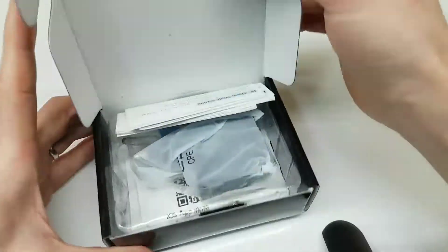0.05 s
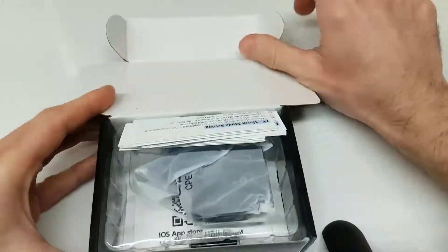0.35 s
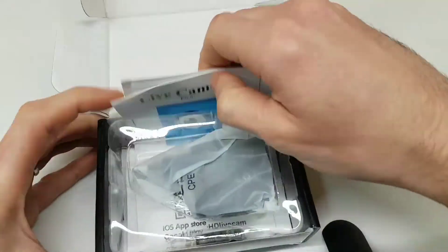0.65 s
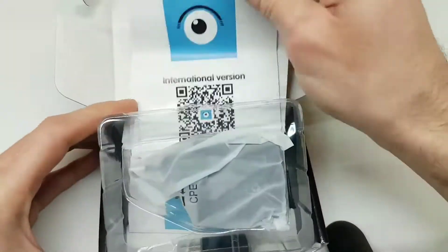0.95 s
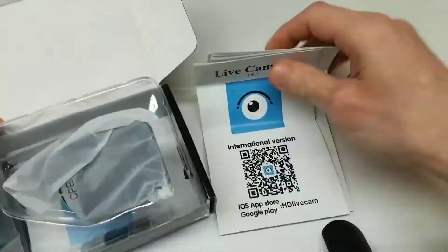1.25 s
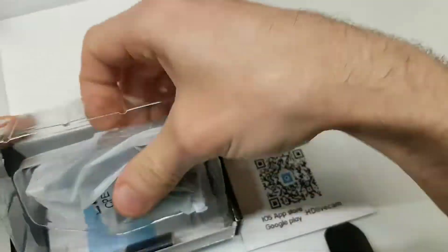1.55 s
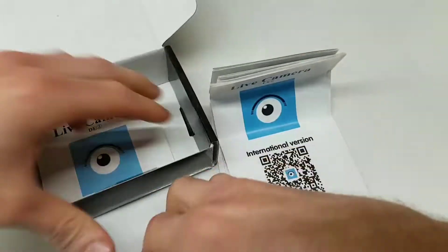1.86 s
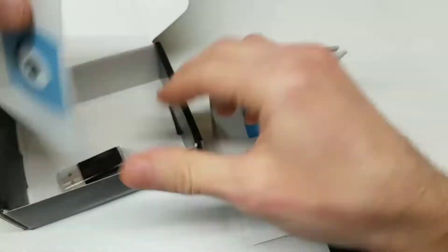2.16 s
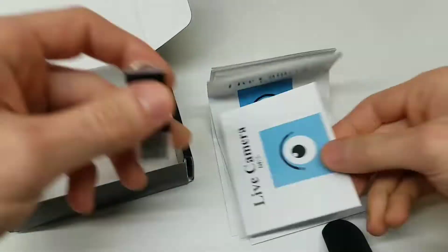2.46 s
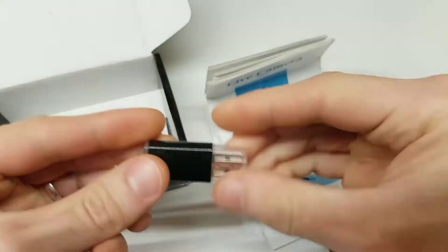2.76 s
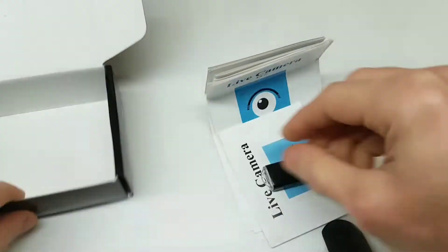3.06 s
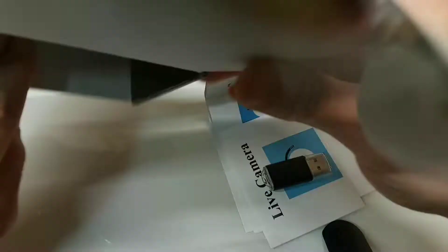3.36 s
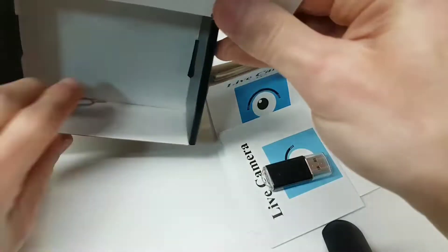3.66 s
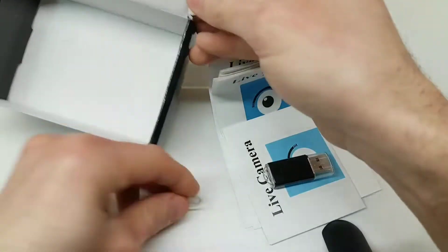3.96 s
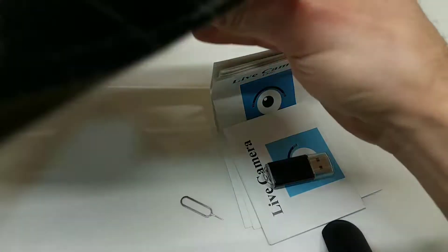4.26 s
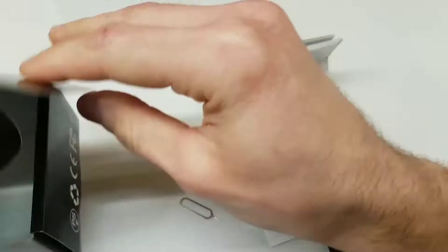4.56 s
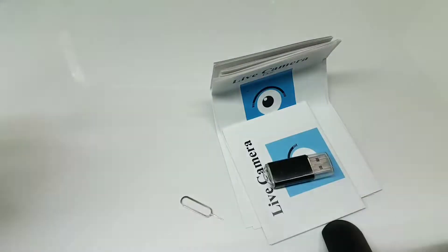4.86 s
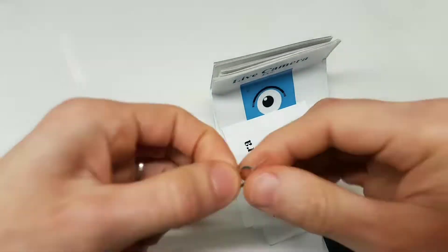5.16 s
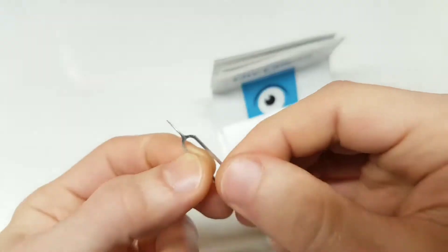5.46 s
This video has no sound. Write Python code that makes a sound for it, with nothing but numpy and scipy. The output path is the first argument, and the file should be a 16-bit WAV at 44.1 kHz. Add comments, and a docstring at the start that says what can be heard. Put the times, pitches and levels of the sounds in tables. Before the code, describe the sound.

Fingers fold back the lid of a small cardboard box with soft rubs and taps. A paper leaflet slides out, then a thin plastic tray scrapes and crackles as it is lifted. A memory stick drops into the box with a clack and a tiny metallic clink. The empty box is turned over and put aside with hollow scrapes and light knocks, all close to the microphone in a quiet room.

```python
"""A small cardboard box is unpacked on a table in a quiet room, close to the microphone.
Fingers fold back the lid and a leaflet slides out; stick-slip on the card drives panels and inner air.
A thin plastic tray slides and snaps as it is lifted out. A memory stick drops onto the bottom of the
box, its metal plug clinking. The empty box, ringing higher, is turned over and put aside."""
import sys
import numpy as np
from scipy import signal
from scipy.fft import rfft, irfft
from scipy.io import wavfile

SR = 44100
rng = np.random.default_rng(int(sys.argv[2]) if len(sys.argv) > 2 else 0)


def materialize(psi):
    """Save the field psi as 16-bit PCM at rate SR to the path in sys.argv[1].

    A 1-D psi becomes a single channel; in a 2-D psi each row is a channel.
    """
    bounded = np.clip(np.atleast_2d(psi).T, -1, 1)
    quanta = np.round(bounded * 32767).astype(np.int16)
    wavfile.write(sys.argv[1], SR, quanta)


N = 247842
TIME_S, BINS_HZ = np.arange(N) / SR, np.fft.rfftfreq(N, 1 / SR)
# what slides on the card: name -> (cavity/dB and hiss/dB against the panel, hiss tilt (+ is brighter),
# panel resonance f/Hz, width/Hz, its power share (clipped to 0-1))
CONTACTS = {"brush": (-0.5, 0.5, 0.2, 1239, 205, 0.4), "finger": (-4, -6.5, .05, 1179, 174, .5),
            "paper": (-6, -14, .05, 884, 130, 0.8), "leaflet": (-2, -8, -0.6, 1874, 374, -0.26),
            "plastic": (-8.5, -8.5, -0.94, 939, 141, .55), "edge": (-12, -11, -0.1, 1572, 301, .75)}


def snaps(cavity_db=-6, crack_db=1, crack_s=0.0002, strain_db=-17, strain_s=0.0028):
    """Tray, card and stick creak under strain, then let go. Returns cavity and panel drive, ring, tick."""
    events = [ (0.1041, -50, 1130, .03, -48.5), (0.3896, -43, 1205, 0.038, -73),
              (0.7974, -31.5, 2110, .034, -45), (0.8284, -29.5, 557, 0.018, -28),
              (0.8955, -28.5, 588, .06, -38), (0.897, -28.5, 1850, 0.029, -47),
              (0.91, -41, 550, 0.015, -39), (1.2177, -47.5, 1080, 0.024, -70),
              (1.4378, -27, 1120, 0.033, -30.5), (1.439, -32.5, 3120, 0.033, -35),
              (1.478, -40, 1120, .06, -45), (1.484, -37.5, 1020, .034, -48), (1.5359, -52, 980, .07, -39.5),
              (1.589, -27.5, 958, .06, -30), (1.599, -26.5, 990, .022, -21),
              (1.606, -33, 3090, 0.019, -28.5), (1.6509, -38, 1390, .026, -37),
              (1.7964, -43, 862, .06, -66), (1.865, -25.5, 1614, .022, -30.5), (2.112, -52, 950, .02, -46),
              (2.1873, -27, 830, .024, -19.5), (2.2131, -19.5, 960, .022, -26),
              (2.2712, -64, 1680, 0.03, -45.5), (3.0982, -47, 990, 0.025, -57),
              (3.2715, -46.5, 500, .05, -50.5), (3.332, -49.5, 1070, .05, -54),
              (3.614, -39, 1670, 0.015, -49), (4.0954, -52, 496, 0.0086, -55),
              (4.1132, -62, 510, 0.012, -46.5), (4.42, -56.5, 1115, 0.064, -68),
              (4.493, -62, 1110, 0.016, -55)]  # t/s, body level/dB, ring f/Hz, body t60/s, tick level/dB
    ring_share = [(-44, 0.74), (-35.5, 0.4)]  # hard contacts wake more modes: body level/dB, ring power share
    tick_spectrum = [(1500, -28.5), (3500, -3), (5500, -5.5), (7300, -7.5), (9500, -2.5), (11200, 1),
                     (13500, 1), (15300, 0.5), (16500, -2.5)]  # f/Hz, level/dB
    body, ring, tick = np.zeros((3, 2, N))
    lead_s = 0.02
    t = TIME_S[:SR // 10] - lead_s
    released, since_s = t >= 0, np.maximum(t, 0)
    strain = ~released * amp(strain_db) * np.exp(-abs(t) / strain_s)
    crack = strain + released * amp(crack_db) * np.exp(-since_s / crack_s) / 2
    for at_s, body_db, hz, t60_s, tick_db in events:
        start_s = at_s - lead_s
        share = np.interp(body_db, *np.transpose(ring_share))
        envelope = amp(body_db) * (strain + released * decay(since_s, t60_s))
        add(body, start_s, np.sqrt(1 - share) * envelope * stereo_noise(0.43, len(t)))
        add(ring, start_s, np.sqrt(2 * share) * envelope * np.cos(2 * np.pi * hz * t))
        burst = crack * stereo_noise(0.4, len(t))
        modes = 0.65 * released * high_modes(since_s, 0.81 * t60_s)
        add(tick, start_s, amp(tick_db) * (burst + modes))
    return np.array([amp(cavity_db) * body, body, ring, colour(tick, tick_spectrum)])


def high_modes(t, t60_s, low_hz=1700, high_hz=14800, count=72):
    """Thin plastic and card have many high modes; each snap rings a different set."""
    hz = rng.uniform(low_hz, high_hz, (count, 1))
    phase = 2 * np.pi * rng.random((count, 1)) + 1.9 * rng.standard_normal((2, count, 1))
    mode_t60_s = t60_s * 2 ** rng.uniform(-0.487, 0.51, (count, 1))
    return np.sqrt(2 / count) * (decay(t, mode_t60_s) * np.sin(2 * np.pi * hz * t + phase)).sum(1)


def plug_clink(at_s=2.1877, hit_db=-23.5):
    """The thin metal shell of the plug rings briefly as the stick lands."""
    shell_modes = [(5710, -18.5, 0.07), (9780, -6.5, 0.032), (10860, -2, 0.035), (11241, 1.5, 0.027),
                   (12049, -19.5, .03)]  # f/Hz, level/dB re hit, t60/s
    out, t = np.zeros((2, N)), TIME_S[:SR // 6]
    for hz, db, t60_s in shell_modes:
        add(out, at_s, amp(hit_db + db) * decay(t, t60_s) * np.sin(2 * np.pi * hz * t))
    return lag_right(out, lag_s=0.000012)


def slides(ease_s=0.012):
    """Leaflet, then tray, is pulled over the card, each pull broken where it catches."""
    # each one pull in two stretches, before and after its snaps: t/s, panel level/dB, hiss level/dB
    leaflet = [
        [(0.68, -80, -86), (0.732, -53.5, -68), (0.748, -59, -69), (0.756, -57.5, -65), (0.782, -54, -64),
         (0.792, -65, -70)],
        [(0.918, -51, -47), (0.928, -43.5, -47), (0.954, -57.5, -66), (1.016, -62.5, -74.5),
         (1.098, -53.5, -58.5), (1.128, -54, -58), (1.164, -87, -78), (1.18, -83, -89)],
    ]
    tray = [
        [(1.657, -50, -56), (1.679, -50, -51.5), (1.695, -60.5, -59), (1.715, -47, -70), (1.733, -66, -63),
         (1.757, -53.5, -69), (1.783, -57.5, -62), (1.801, -43.5, -65), (1.821, -55, -66), (1.845, -47.5, -66),
         (1.858, -63, -72)],
        [(1.878, -48.5, -50.5), (1.886, -46.5, -59), (1.898, -46.5, -56), (1.918, -60, -74),
         (1.976, -55.5, -68), (1.992, -71, -85), (2.014, -52.5, -55), (2.102, -65, -70), (2.116, -52, -57.5),
         (2.146, -63, -76), (2.16, -91, -87)],
    ]
    out = np.zeros((4, 2, N))
    pulls = [(leaflet, "leaflet", 1.5, 1.2), (tray, "plastic", 2.5, -1.2)]
    for stretches, contact, panel_gain_db, hiss_gain_db in pulls:
        for stretch in stretches:
            times_s, panel_db, hiss_db = np.transpose(stretch)
            t = np.arange(times_s[0] - ease_s, times_s[-1] + ease_s, 1 / SR)
            ease = np.clip(np.minimum(t - t[0], t[-1] - t) / ease_s, 0, 1)
            push = amp(np.interp(t, times_s, panel_db) + panel_gain_db)
            hiss_envelope = amp(np.interp(t, times_s, hiss_db) + hiss_gain_db)
            add(out, t[0], ease * friction(push, hiss_envelope, contact))
    return out


def rubs(panel_gain_db=0.6, hiss_gain_db=1.25, rise_share=0.36):
    """Short strokes speed up, then slow; what touches the card sets how much it hisses."""
    strokes = [ (0.127, 0.087, -61, "finger"), (0.239, 0.02, -56, "finger"), (0.262, .028, -50.5, "edge"),
               (0.308, 0.023, -53.5, "finger"), (0.357, 0.071, -58.5, "brush"),
               (0.455, 0.03, -59.5, "brush"), (0.527, 0.061, -58.5, "finger"),
               (0.615, 0.043, -59, "finger"), (0.819, 0.024, -48, "leaflet"),
               (0.866, 0.063, -58.5, "leaflet"), (0.907, 0.036, -44, "leaflet"), (1.223, .02, -50, "paper"),
               (1.301, 0.023, -61.5, "paper"), (1.48, 0.1, -64, "paper"), (1.544, 0.03, -42, "plastic"),
               (1.625, 0.08, -57.5, "plastic"), (2.197, 0.021, -37.5, "plastic"),
               (2.224, 0.011, -45, "plastic"), (2.335, 0.034, -50.5, "plastic"),
               (2.371, 0.061, -68.5, "brush"), (2.923, .04, -57.5, "finger"), (3.091, 0.092, -59, "finger"),
               (3.163, 0.031, -56.5, "finger"), (3.291, 0.038, -66, "brush"),
               (3.335, 0.029, -55.5, "finger"), (3.37, 0.034, -52.5, "brush"),
               (3.462, 0.095, -62.5, "finger"), (3.521, 0.047, -58, "edge"), (3.573, .022, -53.5, "finger"),
               (3.626, 0.045, -48.5, "edge"), (3.742, 0.035, -46, "edge"), (3.787, 0.032, -39.5, "edge"),
               (3.837, 0.033, -49.5, "edge"), (4.048, 0.032, -66.5, "brush"), (4.106, 0.036, -63, "brush"),
               (4.214, 0.025, -59, "finger"), (4.276, 0.041, -55.5, "brush"), (4.379, .028, -59.5, "brush"),
               (4.426, 0.033, -66, "brush"), (4.515, 0.066, -65, "brush"), (4.602, 0.057, -63.5, "brush"),
               (4.721, 0.041, -66, "brush"), (5.044, 0.046, -76.5, "brush")]  # t/s at top speed, length/s, panel level/dB, contact
    out = np.zeros((4, 2, N))
    for peak_s, length_s, db, contact in strokes:
        start_s = max(peak_s - 0.25, 0)
        t = start_s + TIME_S[:SR // 2] - peak_s
        flank_s = length_s * np.where(t < 0, rise_share, 1 - rise_share)
        swell = amp(db) * np.exp(-abs(t / flank_s) ** 1.65)
        hiss_db = CONTACTS[contact][1] + hiss_gain_db
        add(out, start_s, friction(amp(panel_gain_db) * swell, amp(hiss_db) * swell, contact))
    return out


def friction(push, hiss_envelope, contact):
    """A contact slides on card. Returns cavity and panel drive, panel resonance, fine hiss."""
    cavity_db, _, tilt, hz, width_hz, share = CONTACTS[contact]
    size, share = len(push), np.clip(share, 0, 1)
    grip = stick_slip(size)
    fizz = unit_rms(signal.lfilter([1, -tilt], [1], stereo_noise(0.92, size)))
    cavity = amp(cavity_db) * push * grip * stereo_noise(0.6, size)
    panel = np.sqrt(1 - share) * hand_reflection(push * grip * stereo_noise(0.15, size))
    ring = np.sqrt(share) * push * resonate(stereo_noise(0.38, size), hz, width_hz)
    hiss = hand_reflection(hiss_envelope * grip * fizz, gain=0.45)
    return np.array([cavity, panel, ring, hiss])


def stick_slip(size, slips_per_s=600, spread_db=5.0, slip_s=0.001, smooth_share=0.46):
    """Fibres catch and let go in tiny uneven bursts over a smooth slide."""
    slipping = rng.random(size) < slips_per_s / SR
    strength = np.minimum(rng.exponential(1, size), 3)
    bursts = slipping * amp(spread_db * strength) ** 2
    power = signal.lfilter([1], [1, -np.exp(-1 / (slip_s * SR))], bursts)
    return np.sqrt(smooth_share + (1 - smooth_share) * power / (power.mean() + 1e-12))


def hand_reflection(x, gain=0.93, far_delay_s=0.002, sway=0.1, sway_hz=2.5):
    """The moving hand reflects a stroke from a changing distance, rippling its spectrum."""
    t = TIME_S[:x.shape[-1]]
    reach, phase = rng.uniform(0.2, 1), rng.random()
    delay_s = reach * far_delay_s * (1 + sway * np.sin(2 * np.pi * (sway_hz * t + phase)))
    echo = x[:, np.clip(np.round((t - delay_s) * SR).astype(int), 0, len(t) - 1)]
    return (x + gain * echo) / np.hypot(1, gain)


def box(cavity, panel, empty_from_s=2.6):
    """Inner air and panels ring higher and more freely once the box is empty."""
    # broad spectra: f/Hz, level/dB
    cavity_packed = [(60, -16), (190, -13), (280, -6.5), (410, 6), (590, 2.5), (720, -3), (1200, -27.5)]
    cavity_empty = [(60, -22), (200, -13.5), (380, -0.5), (470, 6.5), (560, -20), (1000, -18.5)]
    panel_packed = [(350, -32.5), (600, -8), (800, 1.5), (1150, -3.5), (1400, -2), (1900, -1.5),
                    (2900, -7.5), (4500, -23), (7000, -27.5)]
    panel_empty = [(500, -21.5), (900, 7.5), (1150, -2.5), (1650, 1), (2900, 1.5), (3400, -11.5),
                   (6000, -23), (7500, -40)]
    # panel modes: f/Hz, width/Hz, level/dB above the broad spectrum
    modes_packed = [(610, 40, -2.5), (810, 63, 3.5), (976, 100, 8), (1163, 51, 8), (1640, 48, 5),
                    (2680, 46, 5.5), (3160, 56, 1), (3760, 40, 8.5), (4320, 62, 1.5), (5000, 180, 9.5),
                    (5270, 90, 7)]
    modes_empty = [(1285, 32, 14), (1360, 105, 5.4), (1540, 26, 3), (2216, 92, 10.4), (3020, 120, 4.2),
                   (4100, 63, 7.1), (4380, 360, 12.6), (5300, 39, 14), (5000, 89, 8.1), (6340, 60, 17)]
    is_empty = TIME_S > empty_from_s
    air = colour(cavity * ~is_empty, cavity_packed) + colour(cavity * is_empty, cavity_empty)
    packed_card = colour(panel * ~is_empty, panel_packed, modes_packed)
    empty_card = colour(panel * is_empty, panel_empty, modes_empty)
    return air + packed_card + empty_card


def knocks(overtone_ratio=1.7, overtone_db=-15, thud_db=-13):
    """Soft blows on box and table ring one low mode and a weak overtone, with a short thud."""
    blows = [ (0.241, -46, 88, 0.05, -6), (.316, -41, 378, 0.022, 3), (0.389, -38, 334, 0.038, 1),
             (0.518, -50.5, 100, 0.079, -13), (0.725, -46.5, 410, 0.27, -5), (1.894, -49.5, 97, 0.1, -7),
             (2.181, -38, 324, .038, -2.5), (2.188, -40, 240, 0.032, 3), (2.329, -39.5, 392, 0.037, -6),
             (2.624, -38, 417, 0.073, -10.5), (3.03, -53, 487, 0.042, -17), (3.067, -50, 600, 0.037, -19),
             (3.272, -31.5, 313, 0.027, 7.5), (3.489, -47.5, 463, .048, 1),
             (4.098, -47.5, 484, 0.056, -14.5), (4.319, -46, 460, 0.035, 1), (4.518, -38, 323, 0.017, 9.5),
             (4.727, -46.5, 266, 0.013, -15), (5.132, -55, 456, 0.034, -12.5)]  # t/s, level/dB, f/Hz, t60/s, left-right/dB
    out, t = np.zeros((2, N)), TIME_S[:SR // 4]
    for at_s, db, hz, t60_s, pan_db in blows:
        phase = 2 * np.pi * hz * t
        rise_s = 0.042 * t60_s  # softer blows both rise and ring longer
        envelope = (1 - np.exp(-t / rise_s)) * decay(t, t60_s)
        thud = amp(thud_db) * resonate(stereo_noise(0.41, len(t)), 0.57 * hz, width_hz=92)
        tone = np.sin(phase) + amp(overtone_db) * np.sin(overtone_ratio * phase)
        add(out, at_s, amp(db) * balance(pan_db) * envelope * (tone + thud))
    return lag_right(out)


def room_tail(x, wet_db=-19, build_s=0.0076):
    """Faint tail of a small furnished room, each band dying at its own rate."""
    decay_times = [(150, .4), (1000, 0.11), (4000, 0.16), (14000, 0.11)]  # f/Hz, t60/s
    hz, t, bands = signal.stft(rng.standard_normal((2, SR // 2)), SR, nperseg=256)
    envelope = decay(t, at_hz(decay_times, hz)[:, None]) * (1 - np.exp(-t / build_s))
    tail = signal.istft(bands * envelope, SR, nperseg=256)[1]
    return amp(wet_db) * signal.fftconvolve(x, tail / np.linalg.norm(tail[0]), axes=1)[:, :N]


def room_air(level_db=-66.5):
    """Steady low hum and hiss of the room."""
    spectrum = [(15, -32), (30, -14.5), (54, 1.5), (80, -9), (115, -8), (160, -16), (310, -6.5), (550, -15),
                (1000, -18.5), (1400, -17.5), (2200, -20.5), (5000, -31.5), (9500, -34.5), (14000, -27.5),
                (14350, -24.5), (14700, -28), (16000, -35)]  # f/Hz, level/dB
    coherence = [(60, 0.28), (240, 0.39), (950, 0.12), (3770, 0.041), (15000, 1)]  # f/Hz, left-right correlation
    left, other = rfft(rng.standard_normal((2, N)))
    correlation = at_hz(coherence, BINS_HZ)
    right = correlation * left + np.sqrt(1 - correlation ** 2) * other
    return amp(level_db) * unit_rms(irfft(np.array([left, right]) * amp(at_hz(spectrum, BINS_HZ)), N))


def colour(x, spectrum, modes=()):
    """Minimum-phase filter: broad spectrum plus narrow modes; white noise keeps its power."""
    peaks = sum((amp(db) - 1) / (1 + (2 * (BINS_HZ - hz) / width_hz) ** 2) for hz, width_hz, db in modes)
    gain = unit_rms(amp(at_hz(spectrum, BINS_HZ)) * abs(1 + peaks))
    cepstrum = irfft(np.log(gain + 1e-9), N)
    cepstrum[1:N // 2] *= 2
    cepstrum[N // 2 + 1:] = 0
    return irfft(rfft(x) * np.exp(rfft(cepstrum)), N)


def resonate(x, hz, width_hz):
    """One damped band-pass resonance, at rms 1."""
    pole = np.exp((2j * np.pi * hz - np.pi * width_hz) / SR)
    return unit_rms(signal.lfilter([1, 0, -1], np.poly([pole, pole.conjugate()]).real, x))


def stereo_noise(shared_power, size):
    """Left and right noise sharing part of their power."""
    shared, *own = rng.standard_normal((3, size))
    return np.sqrt(shared_power) * shared + np.sqrt(1 - shared_power) * np.array(own)


def lag_right(x, lag_s=0.00022):
    """Sound reaches the right microphone port after the left."""
    return irfft(rfft(x) * np.exp(-2j * np.pi * BINS_HZ * lag_s * np.array([[0], [1]])), N)


def balance(left_right_db):
    """Level difference to left and right gains."""
    return amp(left_right_db * np.array([[0.5], [-0.5]]))


def amp(db):
    """Decibels to gain."""
    return 10 ** (np.asarray(db) / 20)


def unit_rms(x):
    """Scales to rms 1."""
    return x / np.sqrt(np.mean(x ** 2) + 1e-20)


def at_hz(points, hz):
    """Interpolates a table over log frequency."""
    points_hz, values = np.transpose(points)
    return np.interp(np.log(hz + 1), np.log(points_hz + 1), values)


def decay(t, t60_s):
    """Falls 60 dB in t60_s."""
    return np.exp(-np.log(1000) * t / t60_s)


def add(mix, at_s, sound):
    """Mixes a sound in at at_s."""
    part = mix[..., max(round(at_s * SR), 0):][..., :sound.shape[-1]]
    part += sound[..., :part.shape[-1]]


def scene():
    """Slides, rubs and snaps excite one box; knocks, plug and room join them."""
    hiss_spectrum = [(1500, -23), (3500, -3.5), (5500, -6.5), (7300, -4), (9500, -2), (11200, 6),
                     (12600, 5), (15400, -1), (16500, -24)]  # sliding hiss: f/Hz, level/dB
    *card, hiss = slides() + rubs()
    cavity, panel, ring, treble = np.array([*card, colour(hiss, hiss_spectrum)]) + snaps()
    handling = lag_right(box(cavity, panel) + ring) + treble + knocks() + plug_clink()
    return handling + room_tail(handling) + room_air()


def record(dry):
    """The right port hears slightly more bass; low-pass at 16.3 kHz."""
    lean_db = at_hz([(100, -1.5), (380, -3), (800, 0.5), (12000, 0)], BINS_HZ)  # f/Hz, left-right/dB
    heard = irfft(rfft(dry) * balance(lean_db), N)
    low_pass = signal.firwin(401, 16300, window=("kaiser", 9), fs=SR)
    return signal.oaconvolve(heard, low_pass[None], "same")


dry = scene()
out = record(dry)
materialize(out)
```